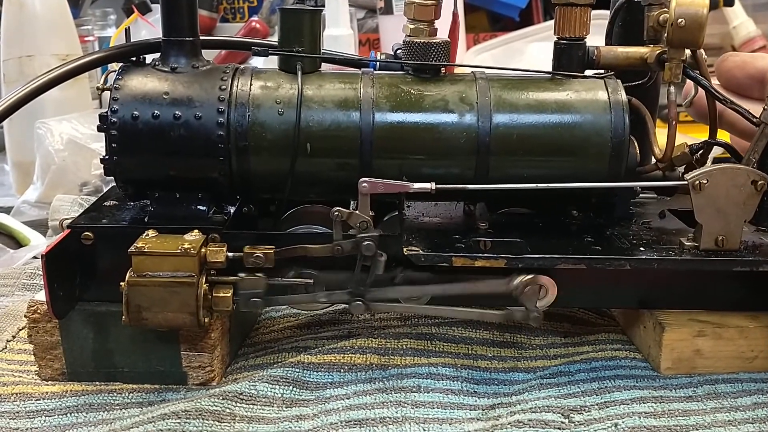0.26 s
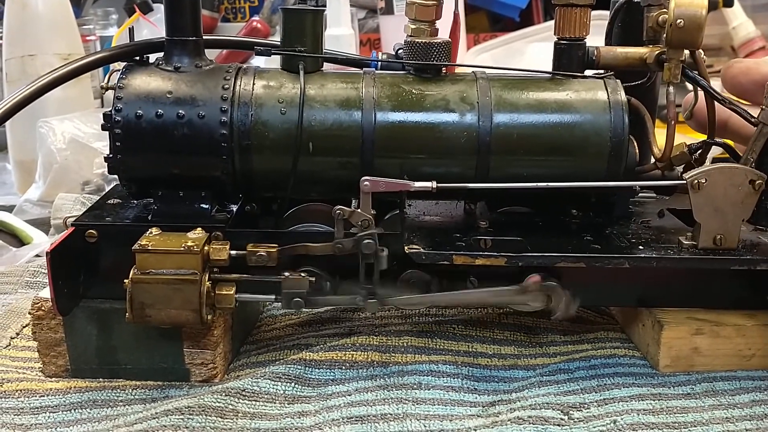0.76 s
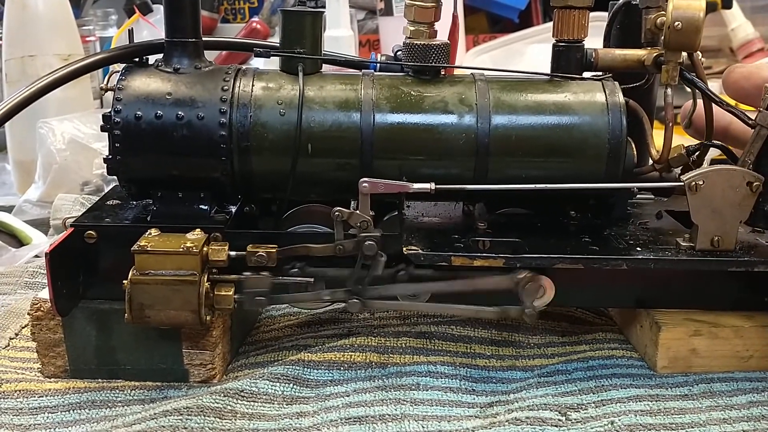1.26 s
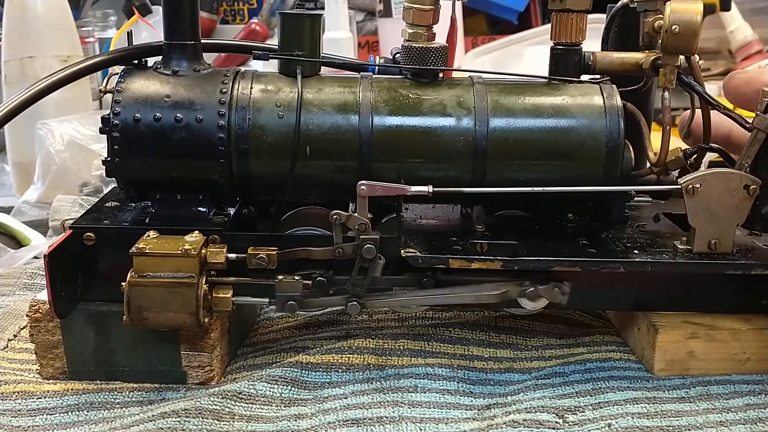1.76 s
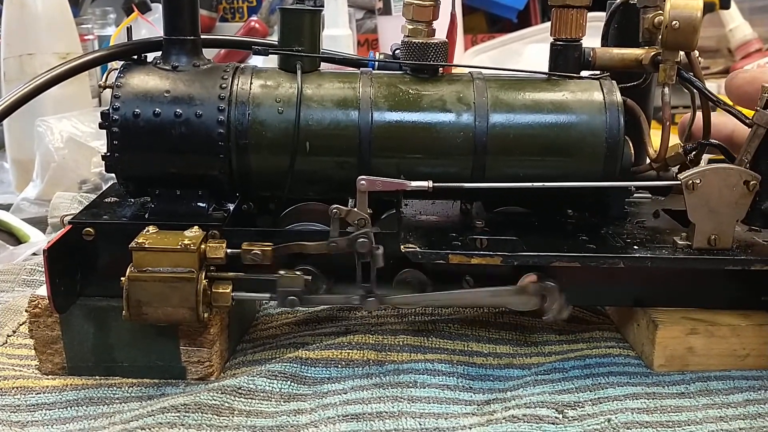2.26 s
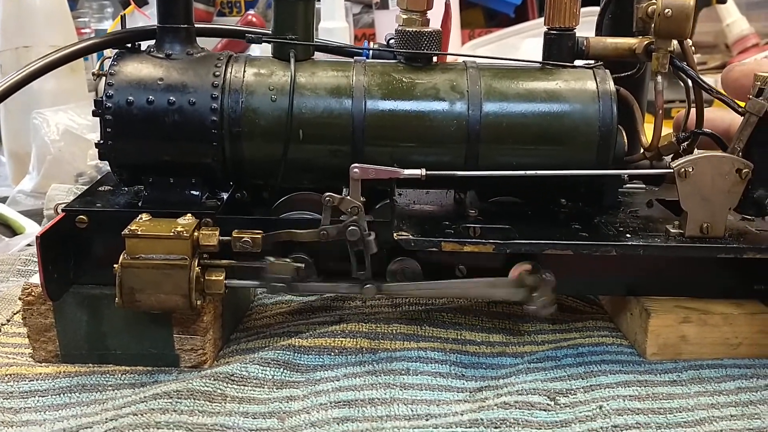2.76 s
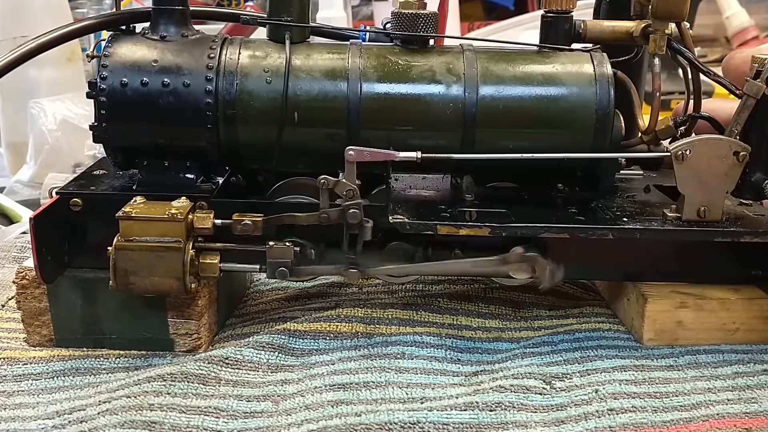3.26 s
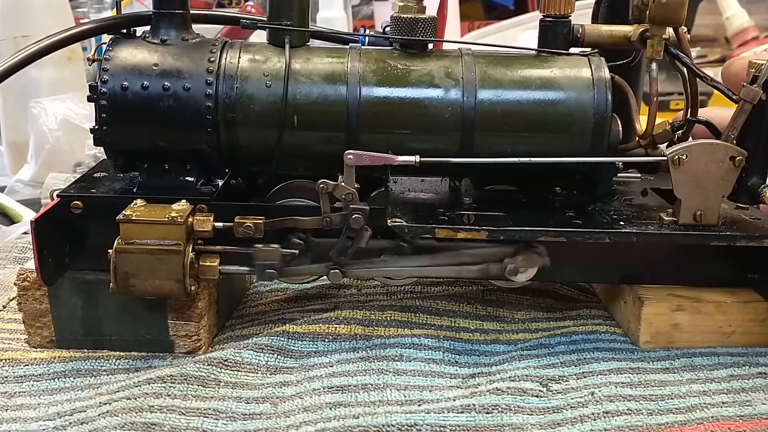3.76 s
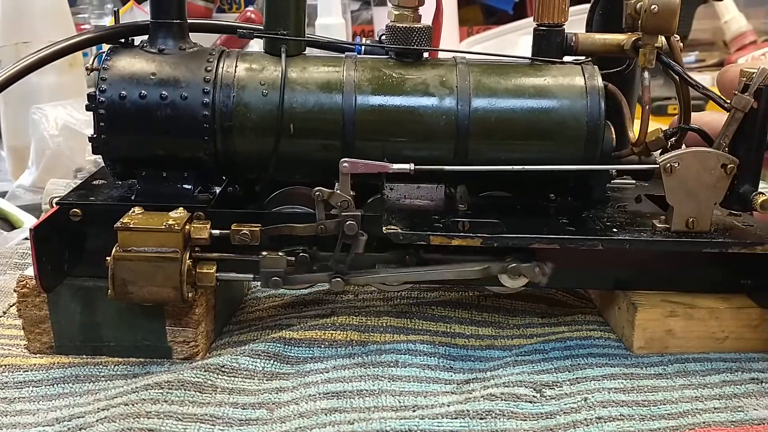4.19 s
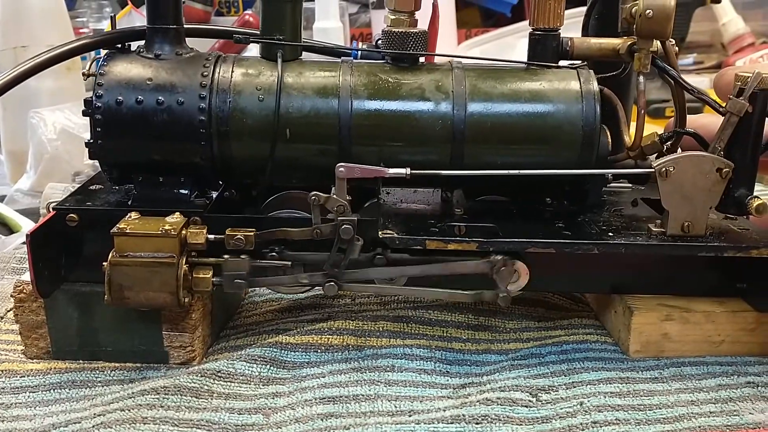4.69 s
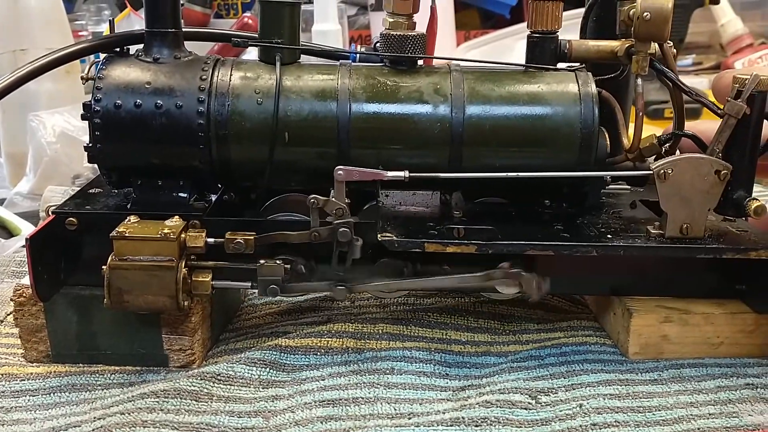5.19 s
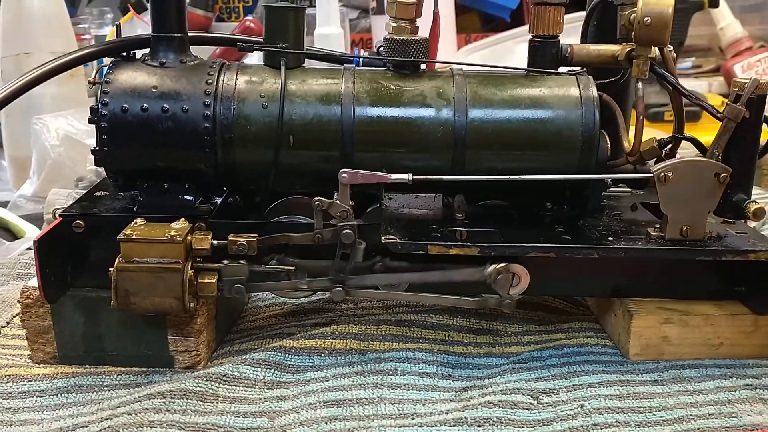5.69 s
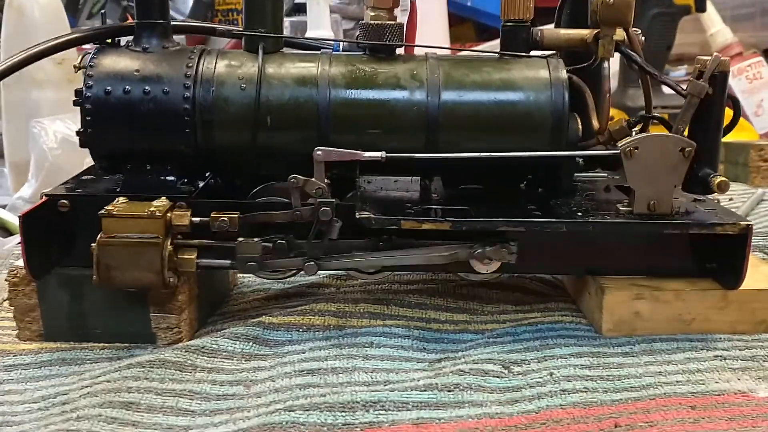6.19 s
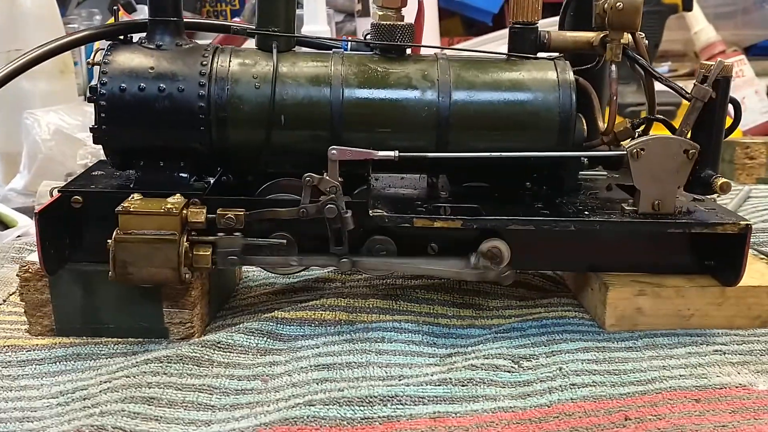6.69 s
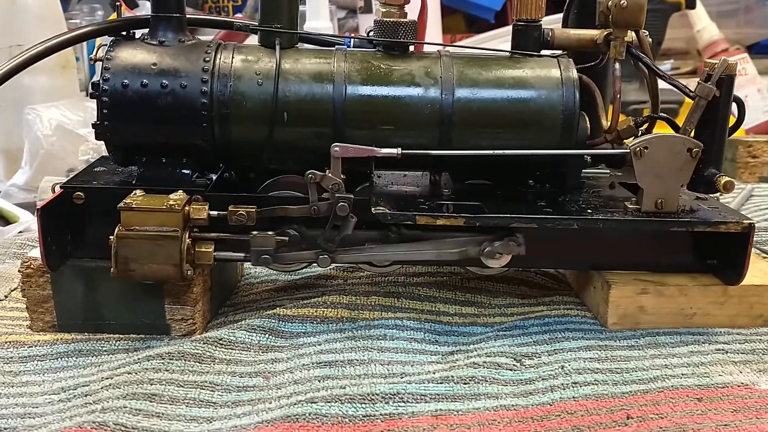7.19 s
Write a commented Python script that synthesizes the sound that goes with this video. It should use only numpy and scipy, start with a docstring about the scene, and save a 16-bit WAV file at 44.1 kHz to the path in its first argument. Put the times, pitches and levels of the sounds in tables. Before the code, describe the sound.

A small model steam locomotive runs on compressed air, with fast hissing puffs and clattering rods, gradually slowing and getting quieter.

```python
"""A model steam locomotive puffs on compressed air, propped up on a workbench, close to the microphone.
As the pressure falls it gets quieter and slows from about seven turns a second to five.
Every turn plays the same round: the valves let out soft puffs, air leaks by the pistons, a port
spits, slack rods knock on the frame, the slides chatter and the pins tick.
Behind it is the faint rumble of a small, quiet workshop."""
import sys
import numpy as np
from scipy import signal
from scipy.fft import rfft, irfft
from scipy.io import wavfile

SR = 44100
rng = np.random.default_rng(int(sys.argv[2]) if len(sys.argv) > 2 else 0)


def to_wav(sig):
    """Store sig (one row per channel, or 1-D mono) as 16-bit WAV at the path in sys.argv[1].

    Samples outside -1..1 are clipped; the rate is SR.
    """
    pcm = np.clip(np.atleast_2d(sig), -1, 1) * 32767
    pcm = np.round(pcm).astype(np.int16)
    wavfile.write(sys.argv[1], SR, pcm.T)  # frames by channels


N = 328545
FFT_SIZE = 4096
TIME = np.arange(N) / SR
HZ = np.maximum(np.fft.rfftfreq(FFT_SIZE, 1 / SR), 1)
FAST_TURNS_PER_S, SLOW_TURNS_PER_S = 7.3, 4.9

# the crank slows down: t/s, turns completed
CRANK_TURNS = [(-.112, -1), (.7096, 5), (1.4301, 10), (1.8789, 13), (2.3427, 16), (2.6635, 18),
               (2.9978, 20), (3.3437, 22), (3.7106, 24), (5.0674, 31), (5.2687, 32), (5.4824, 33),
               (6.5068, 38), (6.7141, 39), (7.5302, 43)]
# the falling air pressure, a fader on the engine: t/s, level/dB
AIR_LEVEL = [(0, -19), (.4, -20), (.7, -20.5), (1.3, -21.5), (1.8, -23.5), (2.3, -25), (3.0, -26.5),
             (3.5, -28.5), (3.9, -30), (5.0, -30), (6.4, -31.5), (7.45, -32)]

# The round. A place is a share of the turn; levels ride on the air level.
# Places and levels in a tuple run from slow to fast running.
# valve puffs: place/turns, rise/turns, hold/turns, release/turns, level/dB
PUFFS = [(-.03, 0.0097, 0.043, 0.43, (-4, -8.5, -9.5)), (.115, 0.018, 0.033, 0.078, (-1.4, -6.5, -2.5)),
         (.275, 0.044, .11, 0.057, (4.7, 1.2, 1)), (.455, 0.025, 0.059, 0.12, (0.5, -0.55, 1)),
         (.665, 0.029, 0.093, 0.073, (-2.5, -1, -1)), (.76, 0.042, 0.033, 0.074, (-0.5, -3.4, -.5))]
# port spits: place/turns, level/dB
SPITS = [((.755, 0.69), (7.6, 3.7, -14.5))]
# rod knocks: place/turns, thump level/dB, clank level/dB
KNOCKS = [((0, 0), (-4.5, -5, -6.5), (2.1, 1, -1.5)), ((.167, .152), (-6, -8, -10.5), (-2.4, -0.42, -10)),
          ((.418, .385), (-5, -12, -18), (1.9, -7.5, -12)), ((.665, .703), (-8, -5.5, -5), (-10, -.5, 1.6)),
          ((.755, .78), (-17, -18, -28), (-4, -1, -8)), ((.818, .84), (-0.19, -3.5, -16), (1.4, -1.8, -18))]
# slide scrapes: place/turns, rise/turns, hold/turns, release/turns, level/dB
SCRAPES = [(0, 0.012, 0.066, 0.12, (-9.5, -13, -12)), (.14, 0.024, 0.037, 0.073, (-2.5, -1.5, -7.5)),
           (.335, 0.014, 0.085, 0.054, (-3.5, -6.5, -10.5)), (.52, 0.025, 0.098, .04, (-12.5, -8, -18)),
           (.65, 0.025, 0.11, 0.041, (-4.5, -2, -7.5)), (.81, 0.031, 0.056, .035, (-0.5, -1.2, -3))]
# pins snapping home: place/turns, tick level/dB, edge level/dB
TICKS = [((-.016, -0.0043), (-0.68, -1, 0), (-17, -11, -11)), ((.16, .15), (-14, -0.5, -1.6),
         (-23, -16, -12)), ((.66, .692), (-13, -2.6, 0), (-10, -1.5, -4.5)), ((.803, .79), (-4, -2.2, -6),
         (-1.1, -4, -6))]

# accents outside the round, extra hard knocks: t/s, thump level/dB, clank level/dB
SLAMS = [(0.3946, -31, -21), (0.8088, -35, -18), (1.545, -45, -23), (2.958, -33, -21.5),
         (3.128, -39, -22.5), (3.3018, -35, -22.5)]

# EQ curves of the air (bright puff, thin leak, shrill spit): f/Hz, level/dB
PUFF_EQ = [(300, -40), (1500, -28.5), (2900, -19), (3600, -22.5), (5100, -30.5), (6300, -19.5), (7500, -11),
           (8300, -0.5), (9500, -3.5), (10100, -11.5), (11500, -16), (13800, -12), (16000, -19)]
LEAK_EQ = [(300, -25), (1400, -16), (2400, -37), (2900, -26), (3200, -12.5), (4100, -10), (4800, -22),
           (5600, -7.5), (6300, -8.5), (7700, -1.5), (9500, 0.5), (10200, -29), (11500, -22), (16000, -11)]
SPIT_EQ = [(100, -75), (4000, -57), (6500, -26), (7600, -6), (8300, 3.5), (9200, -4.5), (10500, -11.5),
           (16000, -29)]
# EQ curves of the metal (rod thump and clank, slide chatter, pin tick and its edge): f/Hz, level/dB
THUMP_EQ = [(30, -64), (70, -37), (150, -26.5), (300, -14.5), (400, -20), (480, -7), (700, 0), (880, 1.5),
            (1050, -1), (1400, -8), (3000, -43)]
CLANK_EQ = [(40, -72), (500, -27), (950, -21), (1250, 3.5), (1650, 3.5), (2000, -3), (2600, -4.5),
            (3000, -16), (3600, -10), (4400, -19), (5200, -24), (8000, -16), (16000, -52)]
CHATTER_EQ = [(30, -55), (100, -21.5), (300, -18), (480, -8.5), (780, 0.5), (1050, -3), (1450, 8),
              (1850, 3.5), (2500, -4.5), (3600, -13.5), (5200, -28.5), (12000, -26)]
TICK_EQ = [(50, -58), (1000, -42), (3500, 1.5), (5200, -9.5), (6500, 0.5), (8500, 0.5), (9600, 2),
           (11000, -6), (13000, -21), (16000, -7.5)]
EDGE_EQ = [(1000, -43), (6000, -14), (9500, -3), (11000, -0.5), (13500, -6), (16000, -2.5)]
# resonances of the air passages, the hollows at the pistons and the frame: f/Hz, width/Hz, boost/dB
PASSAGE_RINGS = [(6510, 110, 12), (6880, 200, 8), (7700, 50, -4), (8376, 76, 5), (8460, 67, -1),
                 (8600, 55, 1), (9200, 150, 0.5), (9340, 105, 2.5), (9560, 48, 10.5), (10870, 100, 8.5)]
HOLLOW_RINGS = [(1460, 140, 2), (3133, 98, 19.5), (3540, 49, 0), (3880, 140, 6.5), (5860, 100, 9),
                (6815, 200, 11.5), (7735, 120, 12.5), (8150, 88, 8), (8460, 69, 18.5), (9260, 170, 10),
                (10900, 170, 2), (12100, 170, 5), (13600, 230, 11), (14090, 110, 7)]
FRAME_RINGS = [(347, 32, 6.6), (458.3, 40, 8.35), (600, 24, 3.9), (685, 105, 3.7), (813, 56, 3.1),
               (927, 14, 3.5), (1106, 22, 3.2), (1860, 83, 2.2), (2230, 84, 6.5), (3450, 170, 3.5),
               (4080, 110, 3.5), (6350, 84, 9.2)]
# the boiler's ring under fast and slow blows: f/Hz, width/Hz, fast boost/dB, slow boost/dB
BOILER_RINGS = [(320, 72, 6.5, -6), (796, 136, 7.5, 3.5), (1470, 195, 17, 0.5), (1730, 270, 1, 4)]

# stereo width of the long, near engine: f/Hz, side minus mid level/dB
WIDTH = [(100, -12), (500, -15.5), (1100, -9), (2200, -2.5), (4500, -2), (8500, -3), (14000, -3)]
# pan across the spectrum: f/Hz, left minus right level/dB
BALANCE = [(60, 3), (99, -0.5), (160, 3), (270, -2), (450, -1.5), (740, 4.5), (1220, 5), (2010, 6),
           (3330, 1), (5500, -3.5), (9080, 13), (15000, 0.5)]
# reflections off the bench and tools, relative to the direct sound: f/Hz, level/dB
REFLECTION_EQ = [(100, 3.5), (500, -11.5), (1200, -13), (2500, -3.5), (5000, 7), (8500, -7.5), (15000, 1)]
# the workshop's room tone: f/Hz, level/dB
ROOM_TONE_EQ = [(25, -1), (50, -17), (85, -6), (130, -4), (180, -4), (330, 0), (600, -17), (2000, -9),
                (10000, -51)]


def exhaust(level_db, flutter_db, wander_db):
    """Air sputters past the oily valves and rings in the narrow passages."""
    jet = noise(from_db(flutter_db * drift(700) + wander_db * drift(50)))
    return tint(jet * from_db(level_db), colour(PUFF_EQ, PASSAGE_RINGS))


def leak(level_db, flutter_db):
    """Air blows by the pistons and sounds the hollow parts around them."""
    jet = noise(from_db(flutter_db * drift(500)))
    return tint(jet * from_db(level_db), colour(LEAK_EQ, HOLLOW_RINGS))


def port(trim_db):
    """A port cracks open and spits a few milliseconds of shrill air."""
    out, shrill = np.zeros((2, N)), colour(SPIT_EQ)
    for s, db in every_turn(SPITS):
        spit = burst(shrill, rise_s=.0019, decay_s=.0015, tail_db=-37, tail_s=.0037)
        add(out, s, from_db(db + trim_db) * spit)
    return out


def rods(pace, thump_trim_db, clank_trim_db):
    """Slack rods thump the frame and clank the metal; the boiler's ring follows the pace."""
    out = np.zeros((2, N))
    dull, bright = colour(THUMP_EQ, FRAME_RINGS), colour(CLANK_EQ, FRAME_RINGS)
    for s, thump_db, clank_db in every_turn(KNOCKS) + SLAMS:
        pace_now = np.interp(s, TIME, pace)
        boiler = peaks([(hz, width, at_pace((slow_db, fast_db), pace_now))
                        for hz, width, fast_db, slow_db in BOILER_RINGS])
        thump = burst(dull + boiler, rise_s=.0012, decay_s=.0018, tail_db=-17, tail_s=.012)
        clank = burst(bright + boiler, rise_s=.0012, decay_s=.0038, tail_db=-20, tail_s=.0078)
        add(out, s - .0015, from_db(thump_db + thump_trim_db) * thump)
        add(out, s - .0005, from_db(clank_db + clank_trim_db) * clank)
    return out


def slides(level_db, grain_db):
    """Crossheads and links scrape in uneven little slips that shake the frame."""
    slips = noise(from_db(grain_db * np.minimum(drift(300), 1.6)))
    return tint(slips * from_db(level_db), colour(CHATTER_EQ, FRAME_RINGS))


def pins(trim_db):
    """Small steel parts meet with a short bright tick, topped by a hard, very high edge."""
    out, steel, sheen = np.zeros((2, N)), colour(TICK_EQ), colour(EDGE_EQ)
    for s, tick_db, edge_db in every_turn(TICKS):
        tick = burst(steel, rise_s=.00025, decay_s=.0018, tail_db=-23, tail_s=.004)
        edge = burst(sheen, rise_s=.0003, decay_s=.0011, tail_db=-28, tail_s=.004)
        add(out, s, from_db(tick_db + trim_db) * tick)
        add(out, s, from_db(edge_db + trim_db) * edge)
    return out


def crank():
    """The engine's clock: angle in turns, pace (0 slow, 1 fast) and air level in dB at every moment."""
    s, turns = np.transpose(CRANK_TURNS)
    speed = np.interp(TIME, (s[1:] + s[:-1]) / 2, np.diff(turns) / np.diff(s))
    pace = np.clip((speed - SLOW_TURNS_PER_S) / (FAST_TURNS_PER_S - SLOW_TURNS_PER_S), 0, 1)
    return np.interp(TIME, s, turns), pace, np.interp(TIME, *np.transpose(AIR_LEVEL))


def at_pace(values, pace):
    """Blend values given from slow to fast running."""
    return np.interp(pace, np.linspace(0, 1, len(values)), values)


def strokes(table):
    """Envelope in dB of sounds that rise, hold and die away once in every turn."""
    angle, pace, _ = crank()
    power = 1e-6   # floor at -60 dB
    for place, rise, hold, release, db in table:
        age = (angle - place) % 1
        envelope = (1 - np.exp(-(age / rise) ** 2)) * np.exp(-np.maximum(age - hold, 0) / release)
        power = power + (envelope * from_db(at_pace(db, pace))) ** 2
    return 10 * np.log10(power)


def every_turn(table, jitter_s=.0008, uneven_db=2):
    """Hits (t/s, level/dB, ...) triggered as the crank passes their place, a little unevenly."""
    angle, pace, air_db = crank()
    hits = []
    for place, *levels in table:
        turn_count = np.floor(angle - at_pace(place, pace))
        for i in np.flatnonzero(np.diff(turn_count) > 0):
            late, harder = rng.standard_normal(2)
            hit_db = [air_db[i] + at_pace(db, pace[i]) + uneven_db * harder for db in levels]
            hits.append((TIME[i] + jitter_s * late, *hit_db))
    return hits


def burst(curve_db, rise_s, decay_s, tail_db, tail_s):
    """A noise hit that swells, dies fast and leaves a tail; unit power over its first 8 ms."""
    t = np.arange(FFT_SIZE) / SR
    attack = 1 - np.exp(-(t / rise_s) ** 2)
    decay = np.exp(-t / decay_s) + from_db(tail_db) * np.exp(-t / tail_s)
    hit = through(noise(attack * decay), curve_db)
    return hit / np.sqrt(np.mean(hit[:, t < .008] ** 2, axis=1, keepdims=True))


def noise(envelope):
    """Two unrelated noises (mid and side) under one envelope; unit power."""
    return rms_one(envelope * rng.standard_normal((2, len(envelope))))


def drift(rate_hz):
    """A random modulator of unit power, gliding to new values at the given rate."""
    knots = np.arange(0, TIME[-1] + 1, 1 / rate_hz)
    return rms_one(np.interp(TIME, knots, rng.standard_normal(N)[:len(knots)]))


def add(out, s, sound):
    """Mix a short sound in at time s."""
    start = int(np.clip(round(s * SR), 0, N - 1))
    out[:, start:start + sound.shape[1]] += sound[:, :N - start]


def from_db(db):
    """Decibels to gain."""
    return 10 ** (np.asarray(db) / 20)


def rms_one(x):
    """Scale to unit power."""
    return x / np.sqrt(np.mean(x ** 2) + 1e-20)


def peaks(resonances):
    """Resonant peaks in dB on the frequency grid."""
    return sum(boost / (1 + (2 * (HZ - centre) / width) ** 2) for centre, width, boost in resonances)


def colour(points, resonances=()):
    """A broad EQ curve plus resonant peaks, in dB on the frequency grid."""
    hz, db = np.transpose(points)
    return np.interp(np.log(HZ), np.log(hz), db) + peaks(resonances)


def through(x, curve_db):
    """Run every channel through a minimum-phase EQ."""
    cepstrum = irfft(np.log(from_db(curve_db)))
    cepstrum[1:FFT_SIZE // 2] *= 2
    cepstrum[FFT_SIZE // 2 + 1:] = 0
    impulse = irfft(np.exp(rfft(cepstrum)))
    return signal.oaconvolve(x, impulse[None], axes=1)[:, :x.shape[1]]


def tint(x, curve_db):
    """Colour a white sound and keep its power."""
    return through(x, curve_db - 10 * np.log10(np.mean(from_db(curve_db) ** 2)))


def workshop(mid_side, bench_t60_s, room_t60_s, room_db):
    """Left and right hear the direct sound, dense bench reflections and a faint room tail."""
    t = np.arange(SR // 2) / SR
    decay = from_db(-60 * t / bench_t60_s) + from_db(room_db - 60 * t / room_t60_s)
    envelope = (1 - np.exp(-t / .00087)) * decay
    wet_db, width_db, balance_db = colour(REFLECTION_EQ), colour(WIDTH), colour(BALANCE)
    # take back the power that reflections, width and pan add
    power_gain = (1 + from_db(wet_db) ** 2) * (1 + from_db(width_db) ** 2)
    trim_db = -10 * np.log10(power_gain * np.cosh(np.log(from_db(balance_db))))
    mid, side = mid_side[:1], through(mid_side[1:], width_db)
    channels = []
    for sign, lag in ((1, 6), (-1, 0)):   # the left is a little farther off: 6 samples late
        direct = np.pad(mid + sign * side, ((0, 0), (lag, 0)))[:, :N]
        echoes = envelope * rng.standard_normal((1, len(t)))
        reverb = signal.oaconvolve(direct, echoes / np.linalg.norm(echoes), axes=1)[:, :N]
        wet = through(reverb, wet_db)
        channels.append(through(direct + wet, trim_db + sign * balance_db / 2))
    return np.vstack(channels)


def room_tone(level_db):
    """The faint low rumble of the workshop, nearly alike on both sides."""
    near_mono = rng.standard_normal(N) + .2 * rng.standard_normal((2, N))
    return from_db(level_db) * tint(near_mono, colour(ROOM_TONE_EQ))


def scene():
    """The crank drives the air and metal layers together, over a bed of room tone."""
    _, pace, air_db = crank()
    puff_db = strokes(PUFFS)
    # the leak pulses more gently than the puffs and grows with the pace
    leak_db = .79 * puff_db + at_pace((-13, -2, -.5), pace)
    air = exhaust(air_db + puff_db, flutter_db=3, wander_db=1)
    air += leak(air_db + leak_db, flutter_db=3.5)
    air += port(trim_db=-2)
    metal = slides(air_db + strokes(SCRAPES), grain_db=4.5)
    metal += rods(pace, thump_trim_db=-2.5, clank_trim_db=-1.2)
    metal += pins(trim_db=-1.46)
    engine = workshop(air + metal, bench_t60_s=.052, room_t60_s=.32, room_db=-14)
    return engine + room_tone(level_db=-59.5)


def record(dry):
    """The microphone sheds the deepest bass, the highest peaks are rounded and the top is cut steeply."""
    low_cut = signal.butter(2, 55, "high", fs=SR, output="sos")
    high_cut = signal.ellip(14, .1, 100, 15900, fs=SR, output="sos")
    lean = signal.sosfilt(low_cut, dry)
    rounded = lean / (1 + (lean / .85) ** 4) ** .25
    return signal.sosfilt(high_cut, rounded)


dry = scene()
out = record(dry)
to_wav(out)
```